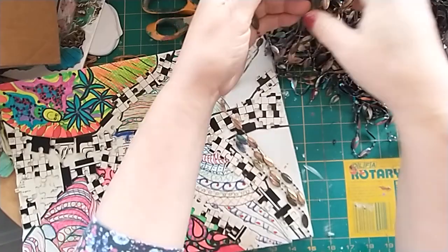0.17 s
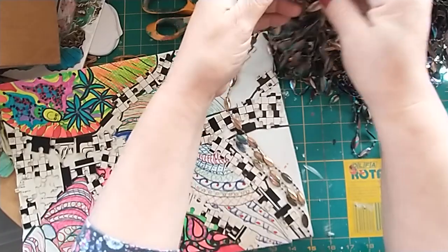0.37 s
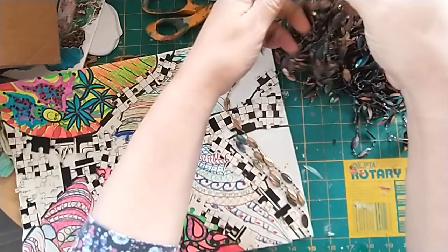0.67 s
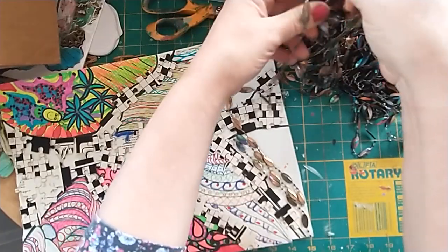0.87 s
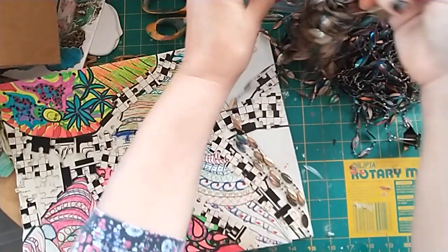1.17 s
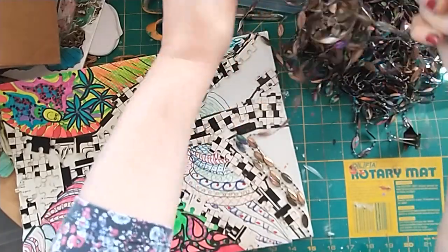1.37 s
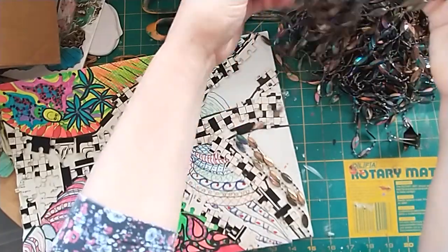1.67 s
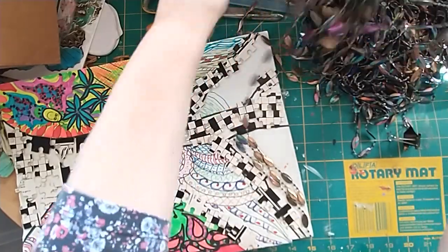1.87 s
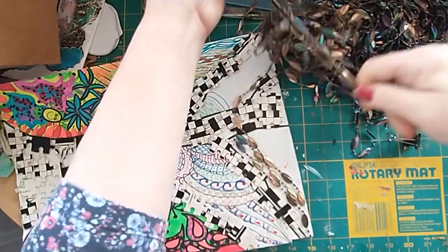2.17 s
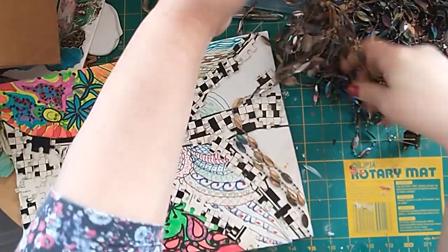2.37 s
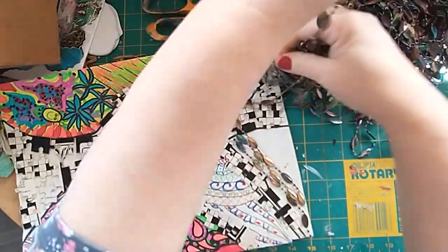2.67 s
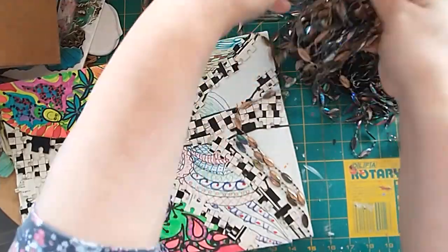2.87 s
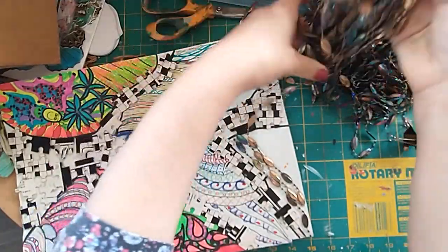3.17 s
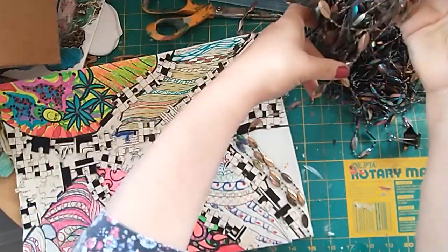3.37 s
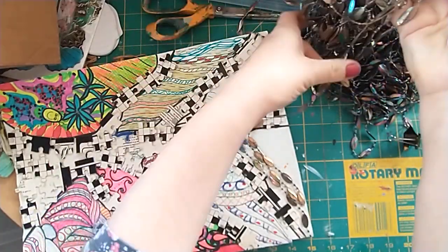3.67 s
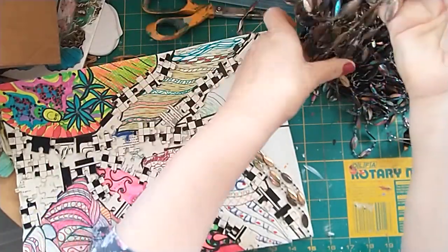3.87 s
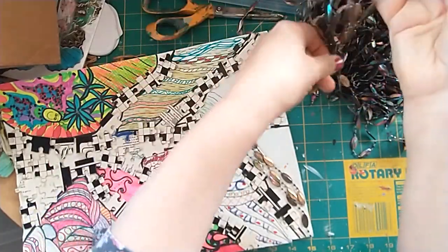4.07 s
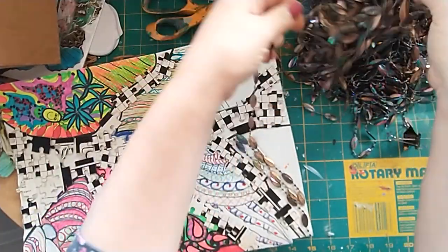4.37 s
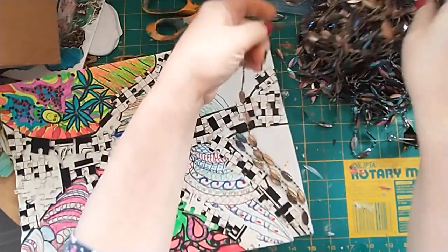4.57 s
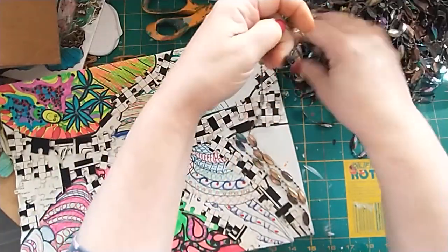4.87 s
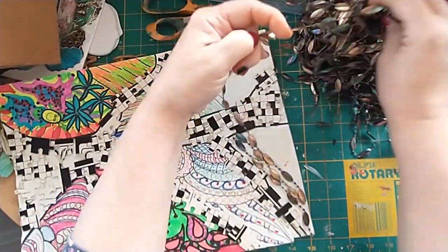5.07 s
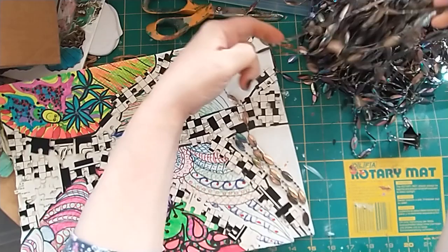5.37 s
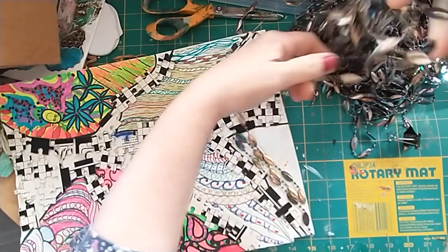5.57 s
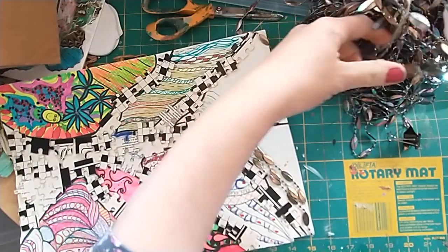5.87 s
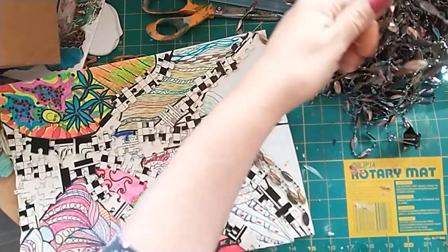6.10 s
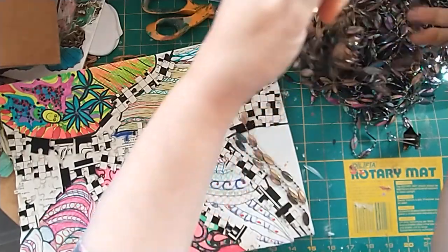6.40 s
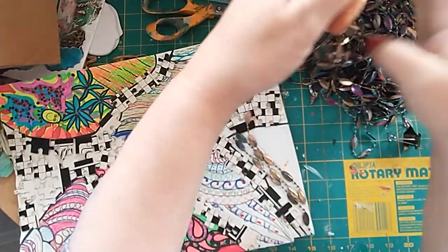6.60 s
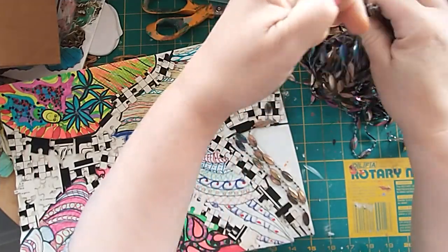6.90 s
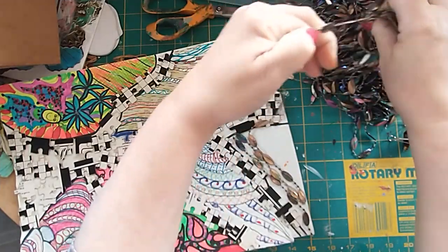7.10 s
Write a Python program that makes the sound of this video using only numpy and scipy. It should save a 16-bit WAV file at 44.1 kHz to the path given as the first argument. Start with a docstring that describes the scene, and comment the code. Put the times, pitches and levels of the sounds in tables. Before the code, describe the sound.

Hands turn over a heap of small beaded strands on a matted craft table. Bright, dense clicking comes in restless bursts with soft dragging and duller knocks, sinks almost away after three seconds, then returns, clicking hardest at about five seconds before fading. Close stereo microphones hang above in a quiet room, the beads slightly to the right, over a faint hush.

```python
"""Two hands turn over a heap of small beaded strands on a craft table in a quiet room, for seven seconds.
From the start beads click in a bright dense rattle, while strands drag over the table top and drop on it,
which sets its duller modes ringing; after three seconds the rattle sinks almost away, then returns in bursts.
The hardest click comes at five seconds, and the rattle fades at the end; echoes and a steady hush lie beneath.
Contacts are random impulses into damped sines. A spaced microphone pair hangs above, the right side nearer."""
import sys
import numpy as np
from scipy import signal
from scipy.fft import rfft, irfft, next_fast_len
from scipy.io import wavfile

SR = 44100
rng = np.random.default_rng(int(sys.argv[2]) if len(sys.argv) > 2 else 0)


def ratio_of_db(decibels):
    """Turn decibels (scalar or array-like) into linear amplitude factors; 0 dB maps to 1."""
    return 10 ** (np.asarray(decibels, float) / 20)


def unload_audio(sound):
    """Save the sound as a 16-bit wav file, at the path given as the first command line argument."""
    columns = np.transpose(np.atleast_2d(sound))
    # keep every value between -1 and 1, then stretch to whole-number steps
    steps = np.round(np.clip(columns, -1, 1) * 32767)
    wavfile.write(sys.argv[1], SR, steps.astype(np.int16))


N = 319284   # samples in the scene


def rms_one(x):
    """Power normalisation: scale so that the mean of the channels has rms 1."""
    return x / np.sqrt(np.mean(np.mean(x, axis=0) ** 2) + 1e-20)


def in_time(rows):
    """Linear interpolation: columns of a curve table, one value per sample."""
    start_s, *columns = np.transpose(rows)
    return [np.interp(np.arange(N) / SR, start_s, column) for column in columns]


def at_hz(points, hz):
    """Logarithmic frequency scale: read a spectrum table in equal steps per octave."""
    table_hz, value = np.array(points).T[:2]
    return np.interp(np.log(hz), np.log(table_hz), value)


def drift(rate_hz):
    """Low-pass noise: a slow random course of spread 1, from a double one-pole at every 20th sample."""
    pole = np.exp(-40 * np.pi * rate_hz / SR)
    white = rng.standard_normal(N // 20 + 2002)
    slow = signal.lfilter([1], [1, -2 * pole, pole * pole], white)[2000:]   # skip the settling
    return np.interp(np.arange(N) / 20, np.arange(len(slow)), slow / slow.std())


def shakes(per_s, t60_s):
    """Clustered shot noise: sudden jolts die away exponentially, each starting a clump of contacts; mean 1."""
    jolts = (rng.random(N) < per_s / SR) * rng.exponential(1, N)
    clumps = signal.lfilter([1], [1, -ratio_of_db(-60 / (t60_s * SR))], jolts + 1e-18)
    return clumps / clumps.mean()


def contacts(per_s, spread_db):
    """Shot noise: random contact moments and sizes, a few far bigger; mean power per second stays the same."""
    at = np.flatnonzero(rng.random(N) < per_s / SR)
    size = ratio_of_db(spread_db * np.minimum(rng.exponential(1, N), 5.0))[at]
    return at, size / np.sqrt(per_s[at])


def ring(impulses, hz, t60_s):
    """Damped resonance: a unit impulse sets a decaying sine of height 1 ringing."""
    r = ratio_of_db(-60 / (t60_s * SR))
    w = 2 * np.pi * hz / SR
    return signal.lfilter([0, np.sin(w)], [1, -2 * r * np.cos(w), r * r], impulses + 1e-18)


def panned(pan_db):
    """Level-difference stereo: left and right gains for a left-right difference in dB."""
    return ratio_of_db(np.array([pan_db / 2, -pan_db / 2]))


def cut_below(x, hz):
    """Radiation efficiency: small bodies hardly radiate below their modes."""
    return signal.sosfilt(signal.butter(4, hz, "high", fs=SR, output="sos"), x)


# how hard the heap rattles: start_s [s], level_db [dB]
RATTLE_LEVEL = [(0.0, -43), (0.28, -43), (0.38, -52), (0.48, -42), (0.54, -50), (0.58, -32), (0.62, -48),
                (0.91, -53), (0.97, -32), (1.03, -32), (1.09, -43), (1.15, -29), (1.35, -42), (1.39, -33),
                (1.43, -43), (1.47, -30), (1.53, -42), (1.63, -32), (1.69, -42), (1.81, -33), (2.28, -40),
                (2.38, -30), (2.58, -50), (2.66, -36), (2.74, -52), (2.8, -38), (2.9, -57), (3.21, -44),
                (3.49, -67), (3.65, -50), (3.79, -51), (3.95, -42), (4.09, -67), (4.27, -38), (4.44, -50),
                (4.49, -38), (4.68, -52), (4.84, -29), (4.96, -42), (5.0, -30), (5.32, -39), (5.36, -33.5),
                (5.73, -47), (5.83, -45), (5.93, -66), (6.07, -37), (6.17, -43), (6.31, -35), (6.33, -42),
                (6.85, -38), (6.94, -51), (7.02, -45), (7.12, -65), (7.24, -62)]
# spectrum of the bead modes: mode_hz [Hz], density_db [dB per Hz]
BEAD_SPECTRUM = [(4000, -60), (5400, -38), (6400, -7), (7400, -5), (9800, 0.5), (11500, -0.5),
                 (12600, -12.5), (14000, -6.5), (16200, -16.5)]
# stereo balance of the rattle: mode_hz [Hz], left_right_db [dB]
RATTLE_BALANCE = [(4500, -19.5), (8000, 1), (11000, -1.5), (15000, -5.5)]


def rattle(busy_db=-40.0, busy_per_s=13000.0, ring_cycles=52, octaves=0.21):
    """Superposed impacts: each bead contact excites the tiny modes near its own pitch, unevenly left and right."""
    level_db, = in_time(RATTLE_LEVEL)
    # harder handling, more contacts
    per_s = busy_per_s * ratio_of_db(0.75 * (level_db - busy_db) + 2.5 * drift(30))
    at, size = contacts(np.clip(per_s, 300.0, SR / 2), spread_db=3.0)
    size = size * (3.28 + shakes(60.0, 0.05))[at]
    size = size * panned(rng.normal(0, 4.0, N)[at])   # each from its own spot
    pitch = rng.uniform(np.log2(3500), np.log2(20000), N)[at]   # log2 of Hz
    swarm = np.zeros((2, N))
    train = np.zeros((2, N))
    for hz in np.geomspace(4500, 16200, 28):
        height = ratio_of_db(at_hz(BEAD_SPECTRUM, hz)) * hz   # shorter modes need more height
        near = np.exp(-0.5 * ((np.log2(hz) - pitch) / octaves) ** 2)
        balance = panned(np.array([at_hz(RATTLE_BALANCE, hz)]))
        train[:, at] = height * near * size * balance * rng.standard_normal(size.shape)
        swarm += ring(train, hz, ring_cycles / hz)
    bright = cut_below(cut_below(swarm, 4350.0), 4350.0)
    return rms_one(bright) * ratio_of_db(level_db)


# loudest bead-on-bead clicks: start_s [s], level_db [dB], tilt_db [dB per octave about 10 kHz]
CLICK_EVENTS = [(0.0404, -31, 0), (0.0768, -27, 2), (0.0878, -24.5, -8), (0.2694, -31, 26),
                (0.414, -33.5, -18), (0.4736, -25.5, 10), (0.5738, -16, 14), (0.6593, -31, 19),
                (0.9649, -19, -4), (1.1156, -25, -2), (1.2547, -18, 7), (1.358, -24, -22),
                (1.3896, -20, -4), (1.5872, -21.5, -5), (1.9125, -21, 0), (1.935, -17.5, -18),
                (2.0108, -19.5, 11), (2.034, -21, 13), (2.2473, -23, 6), (2.3084, -23.5, -10),
                (2.361, -17, -17), (2.6738, -23.5, 6), (2.7995, -21.5, 8), (2.8295, -26, 5),
                (3.3458, -35, -33), (3.6176, -31, 0), (3.8785, -28, 11), (4.484, -23, 1), (4.774, -25.5, 0),
                (4.8, -18.5, -1), (4.9995, -17, 14), (5.022, -13.5, 9), (5.1494, -16.5, 11),
                (5.517, -24, 0), (5.7017, -31, -8), (6.0275, -31.5, -23), (6.064, -21.5, 13),
                (6.0876, -21, 12), (6.255, -20, 10), (6.3097, -18.5, 13), (6.5028, -18, 22),
                (6.6033, -22.5, 5), (6.956, -32.5, 0)]
# clicks come from all over the heap, right of centre
CLICK_PAN_DB, CLICK_PAN_SPREAD_DB = -5.5, 4   # left-right dB and its full range


def clicks(ring_cycles=78.0, bounce_db=-2.5, longest_gap_s=0.0033, count=24):
    """Modal impact: each pair of beads has modes of its own; they meet, then chatter for some milliseconds."""
    out = np.zeros((2, N + 4000))
    t = np.arange(700) / SR
    chance = rng.random((len(CLICK_EVENTS), 7, 1 + 3 * count))   # seven touches a click
    for (start_s, level_db, tilt_db), draws in zip(CLICK_EVENTS, chance):
        pan_db = CLICK_PAN_DB + CLICK_PAN_SPREAD_DB * (draws[1, 1] - 0.5)
        hz = 5000 * 3.2 ** ((np.arange(count) + draws[0, 1:1 + count]) / count)
        height = ratio_of_db(at_hz(BEAD_SPECTRUM, hz) + tilt_db * np.log2(hz / 10000)) * hz
        height *= ratio_of_db(level_db) / np.sqrt(np.sum(height ** 2))
        cycles = np.outer(hz, t)
        modes = np.sin(2 * np.pi * cycles) * np.exp(-np.log(1000) * cycles / ring_cycles)
        late_s = longest_gap_s * (np.cumsum(draws[:, 0]) - draws[0, 0])
        for touch, draw in enumerate(draws):
            start = round((start_s + late_s[touch]) * SR)
            strength = (4 * draw[1 + count:].reshape(2, count) - 2) * ratio_of_db(touch * bounce_db)
            out[:, start:start + len(t)] += (strength * height * panned(np.array([pan_db]))) @ modes
    return cut_below(out[:, :N], 4240.0)


# strands dragging over the table: start_s [s], low_modes_db [dB], high_modes_db [dB]
DRAG_LEVEL = [(0.0, -66.5, -60.5), (0.38, -68, -67), (0.54, -68, -70), (0.87, -69.5, -61),
              (1.23, -57.5, -58.5), (1.43, -64.5, -62), (1.81, -58, -57.5), (2.04, -69.5, -61),
              (2.28, -63.5, -62.5), (2.44, -53.5, -53.5), (2.7, -66.5, -64.5), (2.94, -68, -67),
              (3.1, -68, -70), (3.51, -81.5, -77.5), (4.09, -78.5, -77.5), (4.23, -59, -63.5),
              (4.4, -66, -60), (4.9, -62.5, -61), (5.4, -62, -58), (5.64, -67, -67), (5.83, -73, -69),
              (5.99, -72.5, -70), (6.53, -70.5, -70.5), (7.24, -78, -77)]
# strands dropping on the table: start_s [s], level_db [dB], low_modes_db [dB relative to level_db],
# top_modes_db [dB relative to level_db], pitch_hz of the spot struck [Hz]
DROP_EVENTS = [(0.0034, -39, -30, -11, 1940), (0.1555, -41.5, -14, -10, 2400),
               (0.312, -43.5, -26, -18, 1810), (0.4124, -39, -14, -0.5, 1790), (0.454, -36, -22, -14, 2020),
               (0.4765, -42, -17, -11, 1790), (0.5144, -41, -34, -6, 2400), (0.5783, -37.5, -40, -6, 2260),
               (0.597, -33, -40, -6.5, 2040), (0.619, -38.5, -20, -16, 2250), (0.645, -42, -23, -14, 2230),
               (0.659, -40.5, -14.5, -9, 2200), (0.7104, -46, -30, -6, 2100), (0.7384, -37, -26, -9, 2290),
               (0.9123, -42, -30, -8, 1970), (1.032, -33.5, -43, -6, 1960), (1.068, -37.5, -29, 2.5, 2900),
               (1.1695, -33.5, -23, 0, 1720), (1.1825, -33.5, -38, -4, 1970),
               (1.1959, -29, -38, -0.5, 2370), (1.227, -32.5, -23, 0, 2010),
               (1.3203, -41, -19.5, 7.5, 3200), (1.3597, -29.5, -31, -1, 2130),
               (1.5871, -34, -15, -3, 2040), (1.9358, -25, -20, -3.5, 2030), (2.0428, -36, -25, -2, 1710),
               (2.0975, -36, -19.5, -5.5, 1700), (2.3106, -35, -25, 3, 2180),
               (2.364, -24.5, -14.5, -5, 1560), (2.4486, -34.5, -10.5, -19, 1860),
               (2.9325, -40, -18, -11, 2200), (3.0002, -35, -46, -1, 1800), (3.029, -36, -22.5, -3.5, 2060),
               (3.3468, -38, -36, 1.5, 2100), (3.487, -42, -41, -5.5, 2110), (3.704, -34.5, -19, -6, 2090),
               (3.8837, -44, -18.5, 8, 2100), (4.0076, -47.5, -12, 3, 3070), (4.245, -49.5, -5, 7, 2800),
               (4.443, -37.5, -17.5, -7, 2230), (5.2738, -40.5, -17, -1, 1970),
               (5.455, -29, -22.5, -9, 1950), (5.5223, -42.5, -14, -16, 1910), (5.587, -40, -25, -22, 1940),
               (5.7031, -35, -42, -3, 1900), (5.7479, -43, -8, -3, 2410), (6.2949, -53, -1.5, -1, 1290),
               (6.4592, -42.5, -15.5, -4, 1550), (6.612, -48, -33, -4, 1760),
               (6.672, -41.5, -16.5, -4.5, 1570), (6.7451, -47, -12.5, 0, 1470),
               (6.96, -42.5, -11, -2, 2070), (7.0376, -50, -36, -3.5, 2040),
               (7.1564, -42, -18.5, -12.5, 2010)]
# modes of the table top with its mat: mode_hz [Hz], level_db [dB]
TOP_MODES = [(280, -6), (390, -5), (630, -19), (770, -39), (890, 1.5), (995, -0.5), (1180, -22.5),
             (1330, -15.5), (1480, -16), (1700, -10.5), (1810, -13), (1940, -11), (2070, -9.5), (2230, -9),
             (2420, -8), (2600, -7), (2900, -6), (3220, -4.5), (3580, -3.5), (3900, -4), (4250, -3.5),
             (4700, -4), (5200, -5.5), (5800, -1.5)]
LOW_MODES_HZ, TOP_MODES_HZ = 1150, 3200   # low modes lie below the first, top modes above the second
TABLE_CYCLES = 42   # cycles to fall by 60 dB
DRAG_CENTRE_HZ = 2200   # high modes near here are stirred most
SPOT_DB, SPOT_OCTAVES = 7, 0.13   # a drop favours the middle modes near its pitch
# following beads thin out [s]; heavier drops spill longer [dB per dB] than the usual one [dB]
SPILL_S, SPILL_GROWS, USUAL_DROP_DB = 0.0083, 0.32, -37
LEFT_LAG_SAMPLES = 6   # the right microphone is nearer


def drag_contacts(per_s=1500.0):
    """Friction as shot noise: dragged beads patter on the top; moments, and sizes for low and high modes."""
    at, size = contacts(per_s * ratio_of_db(3.0 * drift(14)), spread_db=3.5)
    size = size * (2.6 + shakes(30.0, 0.12))[at]
    size /= np.sqrt(np.sum(size ** 2) / N)
    return at, size * ratio_of_db(np.array(in_time(DRAG_LEVEL))[:, at])


def drop_contacts(start_s, level_db, spill_db=-7.0):
    """Decaying impact train: a drop is one blow and a dying spill of beads; drop index, moments, gains."""
    after = np.arange(4000)
    landed = rng.random((len(start_s), len(after))) < 1500.0 / SR
    landed[:, 0] = True   # the blow itself
    drop, late = np.nonzero(landed)
    where = np.minimum(np.round(start_s * SR).astype(int)[drop] + late, N - 1)
    decay_s = SPILL_S * ratio_of_db(SPILL_GROWS * (level_db - USUAL_DROP_DB))
    gain = ratio_of_db(spill_db * (late > 0)) * np.exp(-late / SR / decay_s[drop])
    return drop, where, gain


def table():
    """Modal synthesis: dragged beads and dropped strands all ring the same modes of the top."""
    at, drag = drag_contacts()
    start_s, drop_db, low_modes_db, top_modes_db, pitch_hz = np.transpose(DROP_EVENTS)
    drop, where, spill_gain = drop_contacts(start_s, drop_db)
    hz_all, db_all = np.transpose(TOP_MODES)
    power = ratio_of_db(db_all) ** 2 * TABLE_CYCLES / hz_all * SR / (4 * np.log(1000))
    low_power = power[hz_all < LOW_MODES_HZ].sum()
    high_power = power[hz_all > LOW_MODES_HZ].sum()
    steady = np.sqrt([low_power, high_power])   # rms under unit patter
    top = np.zeros((2, N))
    for hz, level_db in TOP_MODES:
        group = int(hz > LOW_MODES_HZ)
        alike = np.clip(1.1 - hz / 4500, 0, 1)   # higher modes radiate unevenly
        share = np.array([[1, 0], [alike, np.sqrt(1 - alike ** 2)]])
        if hz < LOW_MODES_HZ:
            rel_db = low_modes_db
        elif hz > TOP_MODES_HZ:
            rel_db = top_modes_db
        else:
            rel_db = SPOT_DB * (np.exp(-0.5 * (np.log2(hz / pitch_hz) / SPOT_OCTAVES) ** 2) - 0.5)
        sign = rng.choice([-1, 1], (2, len(where)))
        strength = sign * ratio_of_db(rng.normal(0, 2.07, (2, len(where))))
        if group:
            stirred = 0.85 + np.exp(-0.5 * (np.log2(hz / DRAG_CENTRE_HZ) / 1.7) ** 2)
        else:
            stirred = hz > 500   # dragged beads are too light for the lowest
        train = np.zeros((2, N))
        patter = share @ rng.standard_normal((2, len(at)))
        train[:, at] = stirred * drag[group] / steady[group] * patter
        train[:, where] += ratio_of_db(drop_db + rel_db)[drop] * spill_gain * (share @ strength)
        # the mat damps every mode alike per cycle
        top += ratio_of_db(level_db) * ring(train, hz, TABLE_CYCLES / hz)
    top = cut_below(top, 606.0)
    top[0] = np.r_[np.zeros(LEFT_LAG_SAMPLES), top[0, :-LEFT_LAG_SAMPLES]]
    return top * panned(np.array([-1.5]))


ROOM_T60_S, WALL_CUT_HZ, ROOM_DB = 0.26, 8900, -15   # T60 of the lowest pitches, wall low-pass, echo gain


def room(x):
    """Comb-filter reverberation: five feedback delays a side, duller on every round."""
    size = next_fast_len(N + SR // 2)
    phase = -2j * np.pi * np.arange(size // 2 + 1) / size
    dull = np.exp(-2 * np.pi * WALL_CUT_HZ / SR)
    wall = (1 - dull) / (1 - dull * np.exp(phase))
    echo = np.zeros((2, len(phase)), complex)
    lags = (rng.uniform(0.0032, 0.02, 10) * SR).astype(int)
    for k, lag in enumerate(lags):
        loop = ratio_of_db(-60 * lag / SR / ROOM_T60_S) * wall * np.exp(phase * lag)
        echo[k % 2] += loop / (1 - loop) * (-1) ** (k // 2)
    return irfft(rfft(x, size) * echo, size)[:, :N]


# spectrum of the hush: band_hz [Hz], density_db [dB per Hz]
HUSH_SPECTRUM = [(30, -4), (50, -1.5), (100, 3.5), (170, 1.5), (300, -1), (560, -6.5), (900, -12),
                 (1500, -6.5), (3000, -2.5), (6000, 3), (10000, -7.5), (16000, -13.5)]
# left-right likeness of the hush: band_hz [Hz], likeness [correlation, 1 = identical]
HUSH_CORRELATION = [(60, 0.73), (130, 0.47), (400, 0.5), (1400, .05), (15000, .01)]
HUSH_DB = -70.5   # rms of the mean of both sides


def hush():
    """Diffuse-field coherence: steady room and microphone noise in half-octaves, alike only in the bass."""
    out = 0
    edges = 30 * 2 ** np.arange(0, 9.3, 0.5)
    white = rng.standard_normal((2, 2, N))
    for k, (low, high) in enumerate(zip(edges, edges[1:])):
        band = signal.butter(2, [low, high], "band", fs=SR, output="sos")
        mid, side = signal.sosfilt(band, white[k % 2])
        hz = np.sqrt(low * high)
        alike = np.clip(at_hz(HUSH_CORRELATION, hz), -1, 1)
        pair = np.sqrt(1 + alike) * mid + np.sqrt(1 - alike) * side * [[1], [-1]]
        out = out + ratio_of_db(at_hz(HUSH_SPECTRUM, hz)) * pair
    return ratio_of_db(HUSH_DB) * rms_one(out)


def scene():
    """Superposition: beads and table with their echoes, over the hush."""
    near = rattle() + clicks() + table()
    return near + ratio_of_db(ROOM_DB) * room(near) + hush()


def top_cut(x):
    """Nothing passes above the cut-off."""
    return signal.sosfilt(signal.butter(12, 16980, fs=SR, output="sos"), x)


TOP_HZ = 15900   # the stopband begins 300 Hz above


def record(dry):
    """Band limiting: a steep low-pass cuts the top of the band."""
    low_pass = signal.cheby2(14, 50, TOP_HZ + 300, fs=SR, output="sos")
    mix = signal.sosfilt(low_pass, dry)
    return top_cut(mix)


dry = scene()
out = record(dry)
unload_audio(out)
```